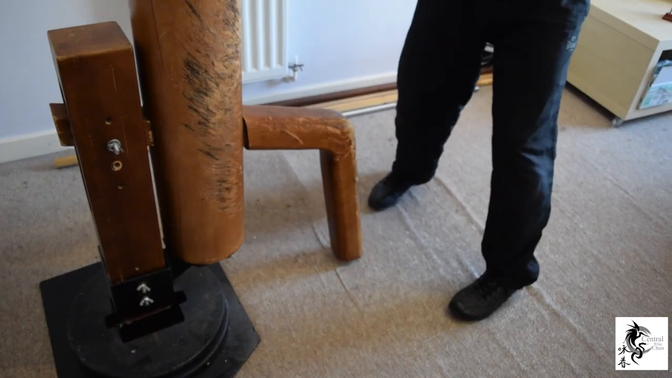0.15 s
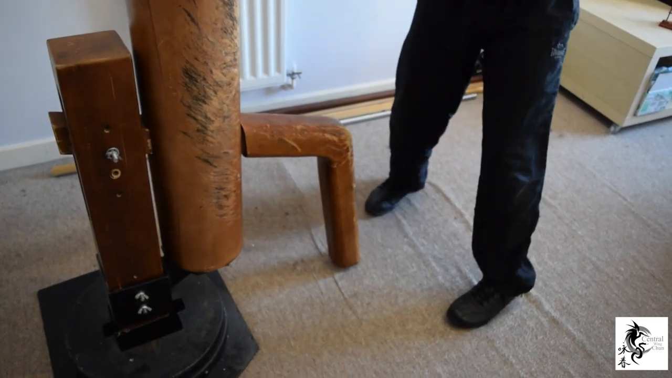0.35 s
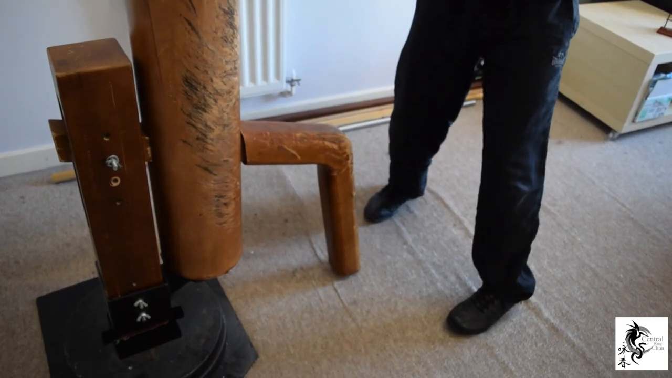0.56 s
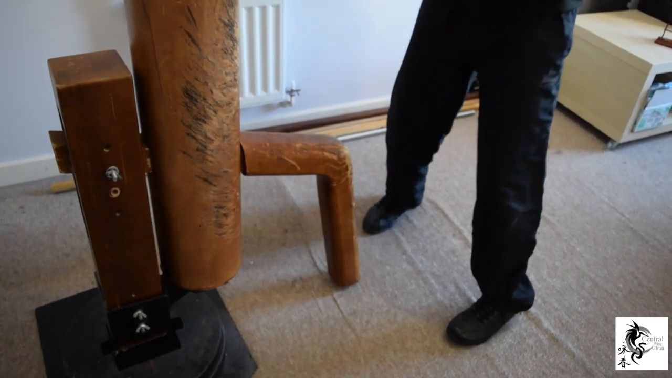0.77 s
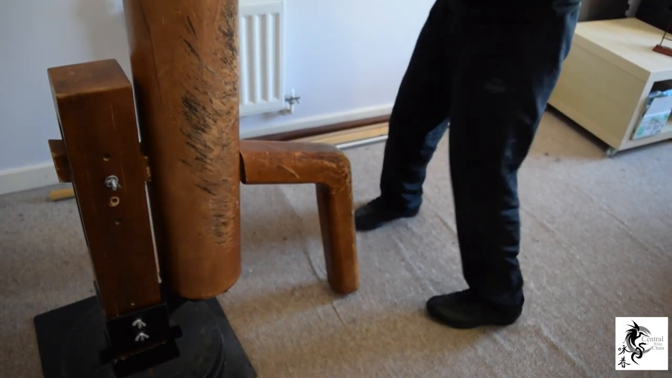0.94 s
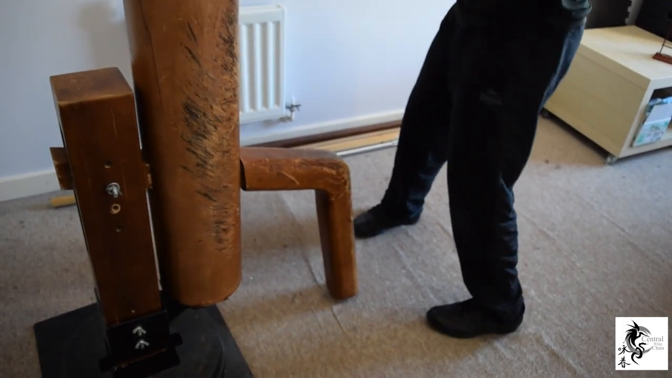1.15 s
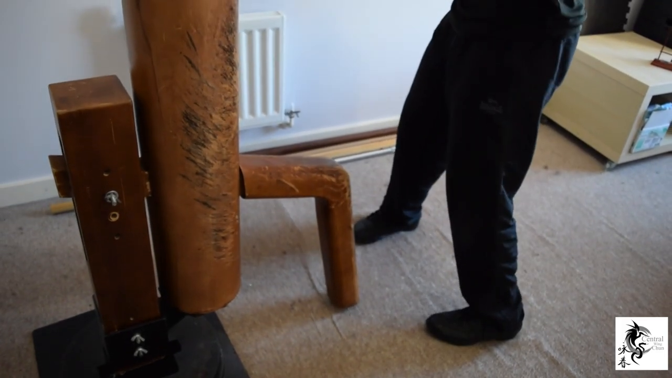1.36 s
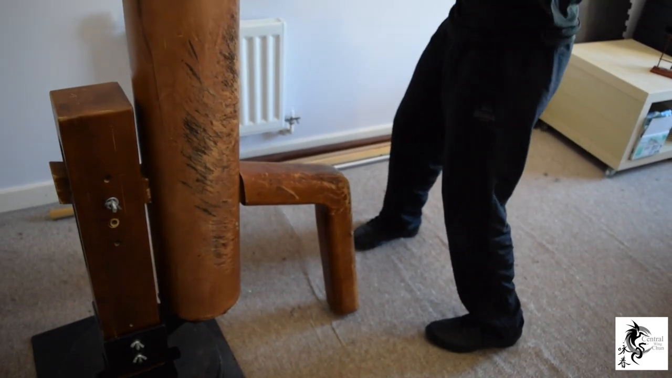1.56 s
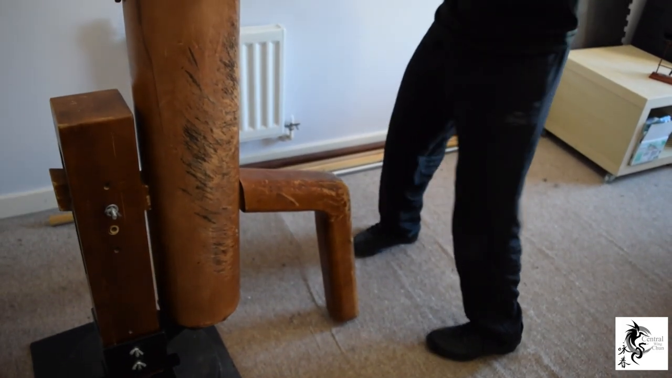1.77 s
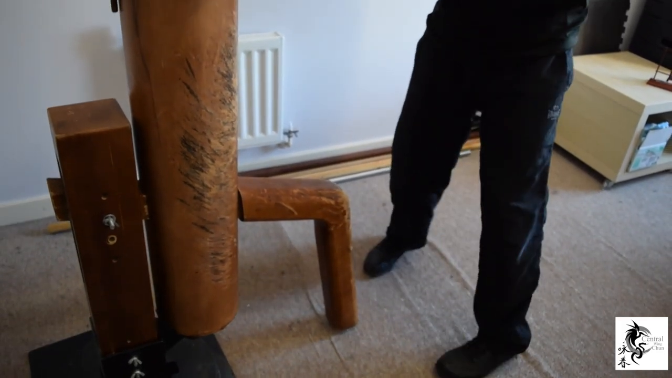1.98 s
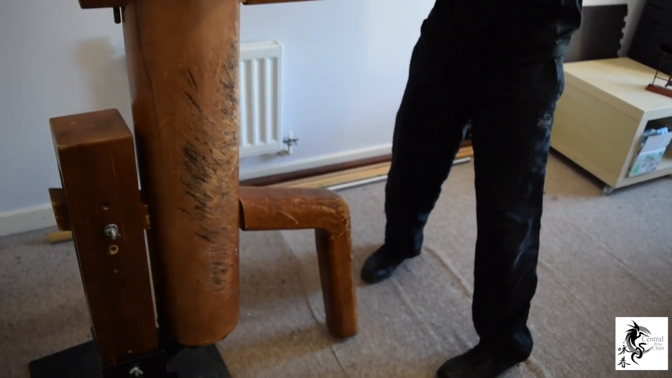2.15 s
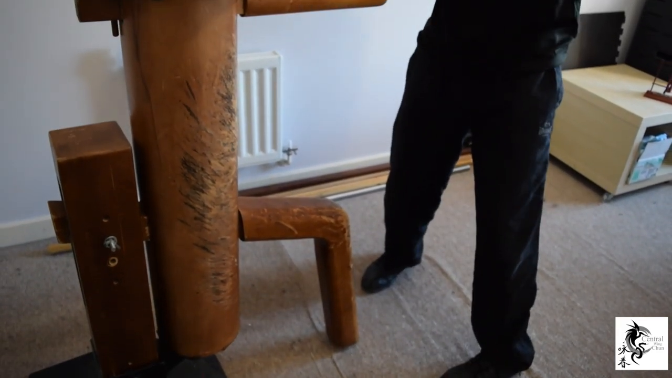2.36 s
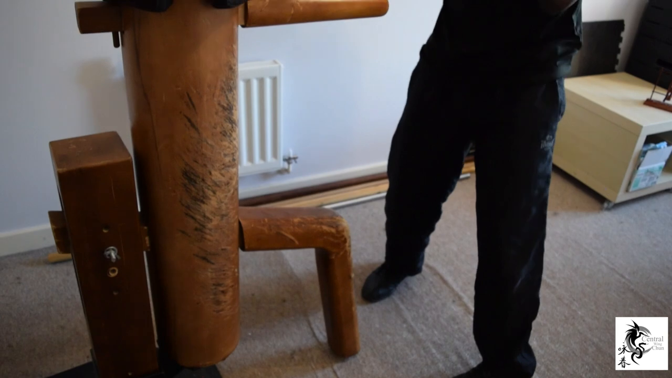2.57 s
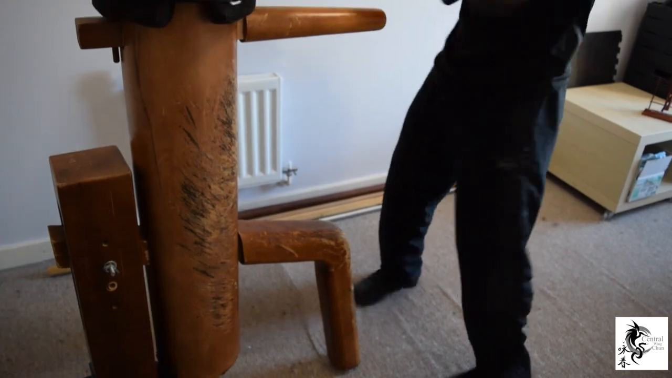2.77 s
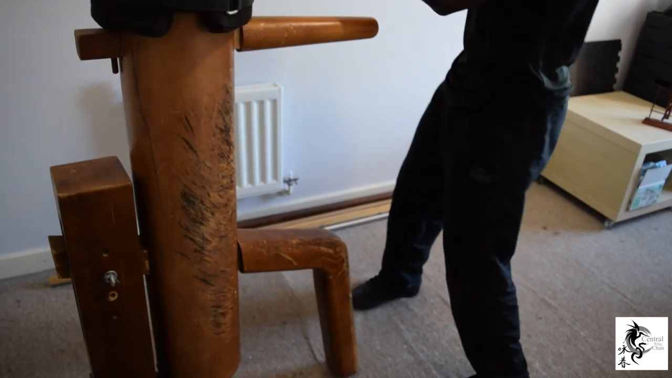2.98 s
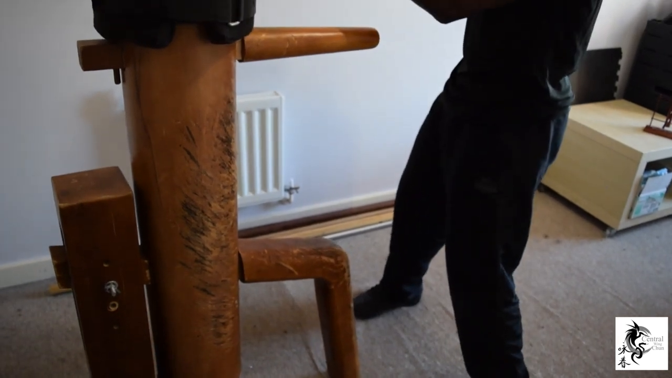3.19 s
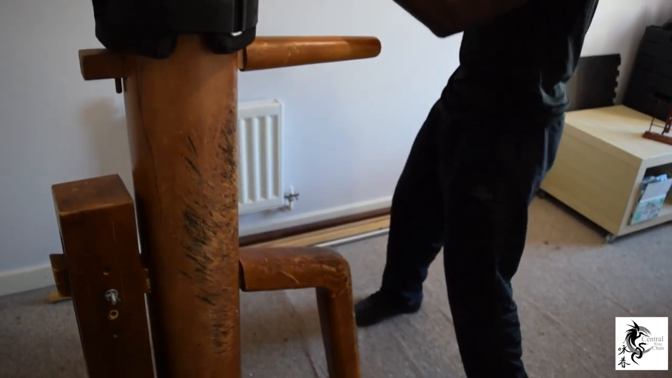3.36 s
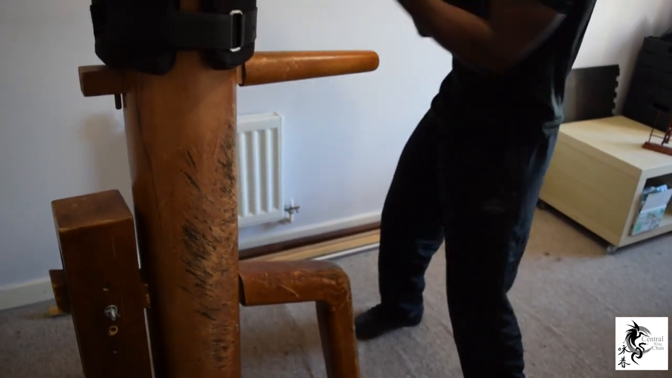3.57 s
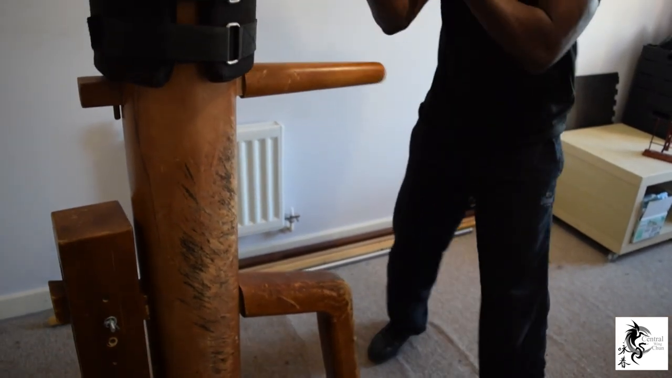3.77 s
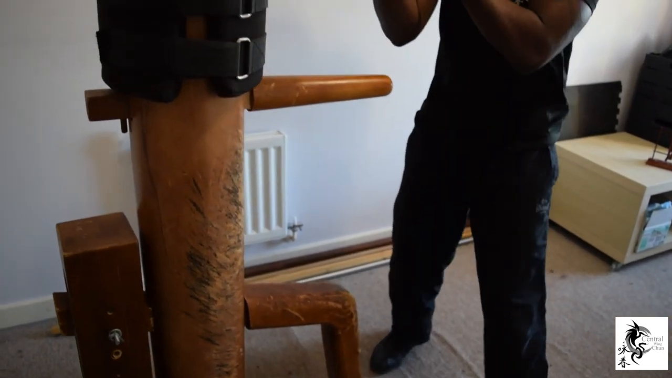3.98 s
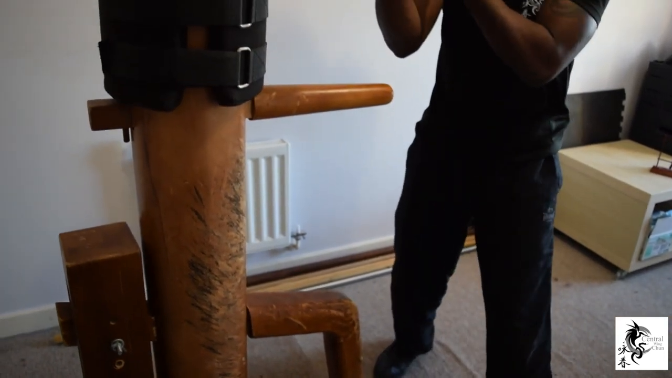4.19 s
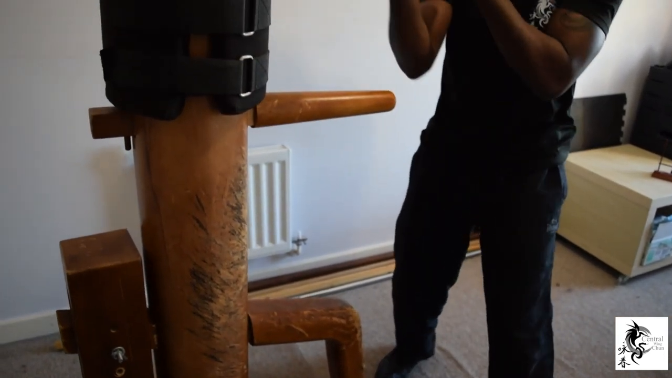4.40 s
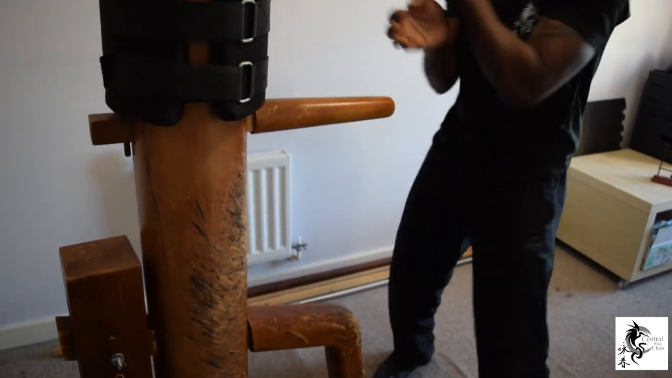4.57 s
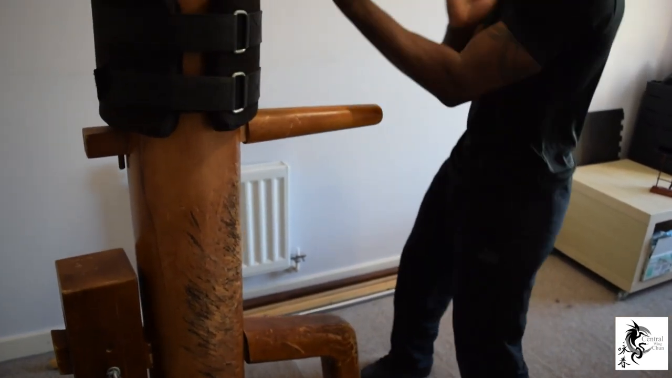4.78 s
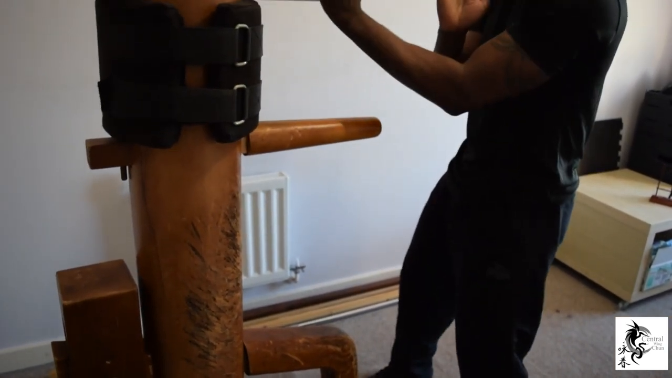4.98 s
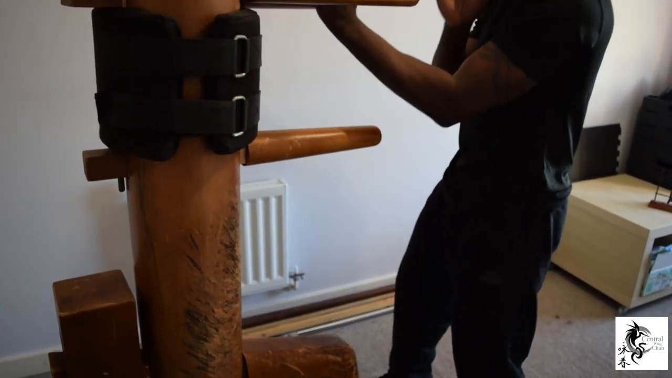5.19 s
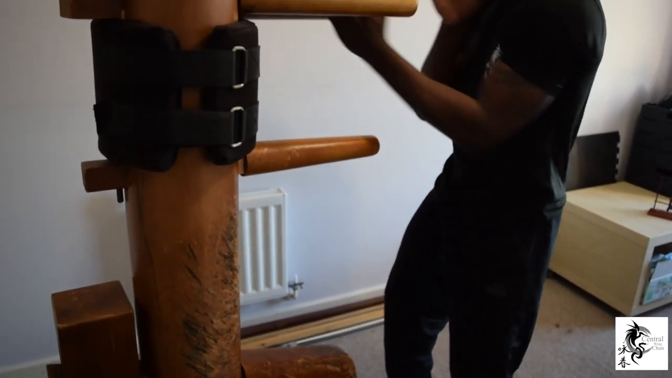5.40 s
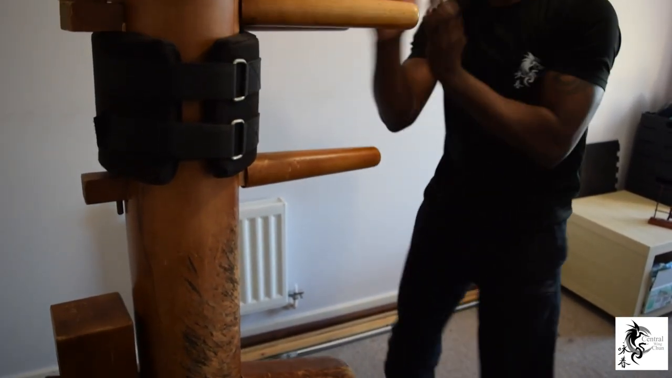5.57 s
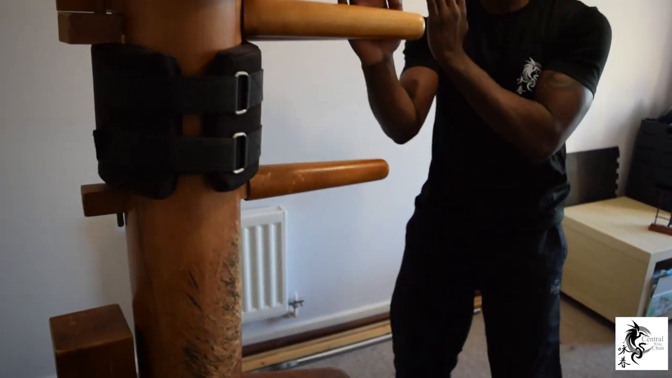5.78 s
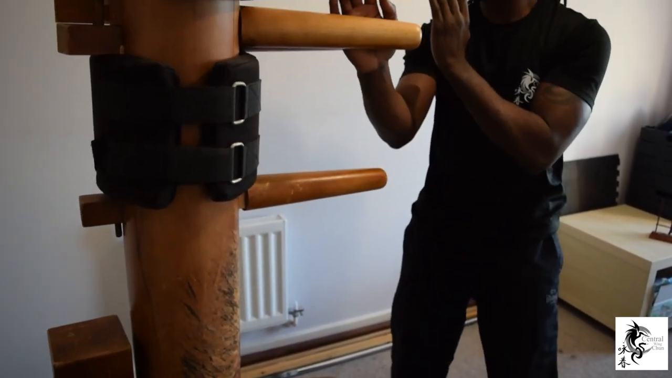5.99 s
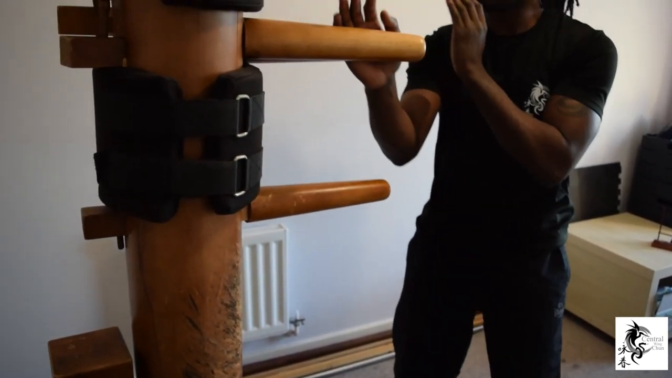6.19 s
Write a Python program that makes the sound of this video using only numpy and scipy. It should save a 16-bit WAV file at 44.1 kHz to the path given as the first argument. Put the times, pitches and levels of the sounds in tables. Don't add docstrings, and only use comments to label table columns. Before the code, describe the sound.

In a small carpeted room, bare hands and forearms hit the loose arms of a wooden dummy roughly once a second. Each blow is a dry, hollow clack with a skin slap and often a quick rattle in the socket. Light taps and cloth swishes fill the gaps. A close, nearly mono camera microphone overloads on hard hits, with soft hiss underneath.

```python
import sys
import numpy as np
from scipy import signal
from scipy.fft import rfft, irfft
from scipy.io import wavfile
from scipy.ndimage import uniform_filter1d

SR = 44100
rng = np.random.default_rng(int(sys.argv[2]) if len(sys.argv) > 2 else 0)


def amplitude_ratio(level_db):
    exponent = np.asarray(level_db, float) / 20
    return 10 ** exponent


def put_to_file(sound):
    columns = np.atleast_2d(sound).T
    safe = np.clip(columns, -1, 1)
    whole_steps = np.round(safe * 32767)
    wavfile.write(sys.argv[1], SR, whole_steps.astype(np.int16))


N = 275267

# (time [s], ring level [dB], share of the higher arm [0-1],
# slap level re ring [dB], hardness [dB per octave])
BLOWS = [(.062, -13.5, 0.06, -12.5, 0), (.140, -17.5, 0.4, -11, -4), (.455, -37.5, 1, -1.5, -1),
         (1.014, 9.5, 1, -15.5, -2.5), (1.109, -18, 0.4, -10.5, -5.5), (1.956, 4.5, 0.3, -16, -2.5),
         (2.889, -17, 0.35, -7.5, -5), (2.897, -12, 0.02, -6.5, -3.5), (2.923, -3.5, 0.36, -5.5, -5),
         (2.944, -10.5, 0.02, -6.5, -4.5), (3.808, -4.5, 0.35, -10, -2), (4.731, -6, 0.39, -17.5, -2),
         (4.742, -1.5, 0.83, -18, -3), (4.751, -7, 0.84, -8, -9), (4.800, -11.5, 0.24, -14, -2.5),
         (5.225, -40.5, 0.14, -8, -4.5), (5.250, -33, 0.08, -8.5, -1), (5.663, -8, 0.17, -21, -3.5)]
# (time [s], ring level [dB], tenon level re ring [dB], hardness [dB per octave])
RATTLES = [(.120, -23.5, -10.5, -5), (.198, -28, -24, -0.5), (.660, -70, -4.5, -2), (1.424, -52, -22, 2),
           (1.987, -7, -14.5, 5.5), (2.017, -5, -17, -1.5), (2.485, -52.5, -24, -2.5),
           (3.421, -53.5, -18, 8), (3.820, 4.5, -23.5, -5), (3.840, 4, -14, 3.5), (5.167, -48.5, -29, 2.5),
           (5.297, -57.5, -40, 7), (5.557, -52, -34, 1.5), (5.676, -8, -32, -4.5), (5.709, -4.5, -19, -2.5),
           (5.736, -24, -10.5, -3)]
# (time [s], ring level [dB], share of the higher arm [0-1], hardness [dB per octave])
TAPS = [(.042, -25, 0, 0), (.261, -42, 0.1, -11), (0.403, -45, 1, -8), (.447, -35.5, 0.66, -1),
        (0.766, -49, 0.37, -3), (1.202, -28.5, 0.3, -3), (1.557, -59, 0, -8.5), (2.370, -62.5, .1, -5.5),
        (2.407, -68.5, 0.1, -7.5), (3.018, -33.5, .4, 0), (3.073, -57, .3, -4), (3.230, -33, .6, -6),
        (4.169, -43.5, 0.23, -6.5), (5.115, -43, 0.57, -7.5), (5.655, -46, 0.46, 6),
        (5.998, -30.5, 0.3, -1.5)]
# (frequency [Hz], level [dB], decay t60 [s])
LOW_ARM_MODES = [(293, -24.5, 0.084), (475.6, -7.5, 0.012), (623.7, -9, 0.064), (635.4, -17.5, 0.097),
                 (771.8, 1.5, .05), (822, 5.5, 0.038), (1368, -2, 0.027), (1552, -4.5, 0.046),
                 (2379, -11, 0.034)]
HIGH_ARM_MODES = [(298, -35.5, .05), (922, -13, 0.091), (873, -4.5, 0.024), (1050.4, 2.5, 0.03),
                  (1144, -7.5, 0.084), (1261, -1, 0.028), (1372, -10, 0.034), (2220, -9, 0.021),
                  (2558, -16, 0.028)]
TENON_MODES = [(3837, 0, 0.023), (3930, -3, 0.012), (4330, -12.5, 0.008), (5900, -7, 0.0096),
               (9800, 1, 0.006), (11200, -24, .008), (643.8, 0, .06), (1506, -2, 0.044),
               (2368, -4.5, 0.039)]
# (frequency [Hz], level [dB])
SLAP_COLOUR = [(40, -43), (250, -12.5), (500, 2.5), (1000, 11), (2000, 7.5), (4000, -4), (8000, -13.5),
               (16000, -28.5)]
# (time [s], frequency [Hz], level [dB])
THUDS = [(.019, 46.3, -37.5), (0.451, 303, -47), (.455, 620, -37), (1.018, 140, -29.5), (1.02, 1184, -16),
         (1.208, 281, -39), (1.558, 643, -53.5), (1.56, 143, -59.5), (1.957, 206, -26), (2.898, 389, -23.5),
         (3.235, 336, -44.5), (3.841, 73.3, -27), (3.86, 612, -18.5), (3.895, 1580, -22.5),
         (3.898, 830, -20.5), (4.163, 480, -46), (4.733, 1040, -14.5), (5.119, 290, -55), (5.249, 302, -51),
         (5.252, 801, -41.5), (5.72, 1570, -26), (5.722, 129, -54), (6.002, 327, -44), (6.004, 620, -39)]
# (time [s], frequency [Hz], level [dB])
TICKS = [(0.049, 1535, -31.5), (.064, 5090, -34), (1.025, 2190, -29.5), (1.03, 11200, -46),
         (2.485, 1900, -69.5), (2.909, 11200, -44.5), (2.92, 1766, -9.5), (3.425, 1750, -47),
         (3.423, 5580, -59.5), (4.752, 3850, -35), (4.801, 4220, -30.5), (4.8, 4450, -35.5),
         (5.297, 5700, -60)]
# (time [s], frequency [Hz], level [dB], decay t60 [s])
HUMS = [
    (0.119, 141.4, -52.5, 0.28),
    (1.019, 1219, -50, 1.3),
    (1.96, 822.4, -43, 0.78),
    (1.96, 867, -54, 0.95),
    (1.962, 1204, -52, 1.2),
    (3.93, 137.6, -54, 0.27),
    (5.998, 68, -77, .47),
]
# (start [s], rise [s], end [s], level [dB])
SWISHES = [(-.1, .03, 0.038, -48), (0.849, 0.023, 0.89, -70.5), (0.899, 0.021, 1, -60.5),
           (1.195, 0.0086, 1.244, -54), (1.658, .05, 1.73, -79.5), (1.835, 0.028, 2.23, -61.5),
           (2.775, 0.027, 3.08, -62), (3.0, 0.032, 3.07, -50.5), (3.342, .02, 3.38, -69),
           (3.689, 0.084, 4.1, -59.5), (4.621, 0.037, 4.74, -61), (5.559, 0.047, 5.85, -61)]
# (frequency [Hz], level [dB per Hz])
CLOTH_COLOUR = [(59, -47.5), (100, -18.5), (243, -5.5), (744, 4), (1110, 6), (2090, 0), (2580, -1.5),
                (3470, -6), (10900, -15.5), (15600, -32)]
# (frequency [Hz], decay t60 [s])
ROOM_T60 = [(60, 0.26), (250, 0.43), (700, 0.36), (1400, 0.41), (2700, 0.3), (5400, 0.3), (8000, 0.22),
            (12000, 0.25), (15000, 0.047)]
# (frequency [Hz], level [dB])
ROOM_COLOUR = [(100, -9.5), (300, -2.5), (700, -1.5), (2500, -2), (6000, -2), (10000, -1.5), (14000, -11)]
# (frequency [Hz], side level re mid [dB])
ROOM_SIDE = [(60, -6), (250, -21), (700, -29), (1400, -24), (2800, -15), (5600, -14.5), (9000, -5),
             (14000, 5)]
# (frequency [Hz], level [dB per Hz])
HUSH_COLOUR = [(20, -28), (60, -12.5), (130, -21.5), (300, -20.5), (700, -15.5), (1300, -16.5), (1800, -19),
               (2400, -22), (5000, -28.5), (10800, -35.5), (15600, -46.5)]
# (frequency [Hz], side level re mid [dB])
HUSH_SIDE = [(60, -14.5), (110, -14), (200, -19), (380, -23), (700, -7.5), (1290, -13.5), (2380, -4.5),
             (4400, -2), (8120, -4), (15000, -4)]


def read(points, hz):
    f, value = np.transpose(points)
    return np.interp(np.log(hz + 1), np.log(f + 1), value)


def evened(x):
    return x / np.sqrt(np.mean(x ** 2) + 1e-20)


def colour(x, points, tilt_db=0):
    hz = np.fft.rfftfreq(x.shape[-1], 1 / SR)
    octaves = np.log2(np.maximum(hz, 300) / 1000)
    gain = amplitude_ratio(read(points, hz) + tilt_db * octaves)
    return irfft(rfft(x) * gain, x.shape[-1])


def add(mix, s, sound):
    part = mix[max(round(s * SR), 0):][:len(sound)]
    part += sound[:len(part)]


def contacts():
    rows = [(s, db, high, slap_db, hard_db, -41, 0) for s, db, high, slap_db, hard_db in BLOWS]
    rows += [(s, db, 0.22, -9.5, hard_db, tenon_db, 0) for s, db, tenon_db, hard_db in RATTLES]
    rows += [(s, db, high, 2.5, hard_db, -40, 0.0032) for s, db, high, hard_db in TAPS]
    return sorted(rows)


def ring(modes, t, chance, tilt_db=0, rise_s=0.0033):
    hz, db, t60 = np.transpose(modes)[:, :, None]
    level_chance, pitch_chance = chance[:2, :len(modes), None]
    db = db + 2 * level_chance + tilt_db * np.log2(hz / hz[0])
    struck_hz = hz * (1 + 0.016 * pitch_chance)
    tones = amplitude_ratio(db - 60 * t / t60) * np.sin(2 * np.pi * struck_hz * t)
    return tones.sum(0) * (1 - np.exp(-t / rise_s))


def knock(row, chance, noise):
    s, db, high, slap_db, hard_db, tenon_db, roll_s = row
    touch_s, touch_db = 0.003, -32
    t = np.arange(len(noise)) / SR
    high = np.clip(high, 0, 1)
    low_arm = np.sqrt(1 - high) * ring(LOW_ARM_MODES, t, chance[0])
    high_arm = np.sqrt(high) * ring(HIGH_ARM_MODES, t, chance[1])
    contact_s = 0.003 * amplitude_ratio(-0.18 * db)
    slap = evened(colour(noise, SLAP_COLOUR, hard_db))
    slap = slap * np.exp(-t / contact_s) * (1 - np.exp(-5 * t / contact_s))
    tenon = ring(TENON_MODES, t, chance[2], 0.97 * hard_db, rise_s=0.00078)
    blow = 0.41 * (low_arm + high_arm) + amplitude_ratio(slap_db) * slap + amplitude_ratio(tenon_db) * tenon
    blow = blow * (1 - np.exp(-t / (abs(roll_s) + 1 / SR)))
    lead = round(touch_s * SR)
    touch = amplitude_ratio(touch_db) * np.pad(slap, (0, lead))
    return s - lead / SR, amplitude_ratio(db) * (np.pad(blow, (lead, 0)) + touch)


def frame():
    out = np.zeros(N)
    t = np.arange(SR) / SR
    thuds = [(*row, 0.058) for row in THUDS]
    ticks = [(*row, 0.012) for row in TICKS]
    for s, hz, db, t60 in thuds + ticks + HUMS:
        attack = 1 - np.exp(-t * hz / 0.92)
        add(out, s, amplitude_ratio(db - 60 * t / t60) * np.sin(2 * np.pi * hz * t) * attack)
    return out


def sleeve():
    t = np.arange(N) / SR
    stroke = np.zeros(N)
    for start, rise, end, db in SWISHES:
        swell = np.clip((t - start) / rise, 0, 1) ** 2
        stroke += amplitude_ratio(db) * swell * np.clip((end - t) / 0.012, 0, 1)
    grain = amplitude_ratio(0.75 * evened(uniform_filter1d(rng.standard_normal(N), 150)))
    return evened(colour(rng.standard_normal(N), CLOTH_COLOUR) * grain) * stroke


def room(x):
    build_s = 0.01
    taps = np.zeros((2, SR))
    at = np.arange(90, SR - 20, 20) + rng.integers(0, 20, (2, (SR - 91) // 20))
    np.put_along_axis(taps, at, rng.choice([-1., 1.], at.shape), 1)
    taps *= 1 - np.exp(-np.arange(SR) / SR / build_s)
    hz, t, bands = signal.stft(taps, SR, nperseg=256)
    decay = amplitude_ratio(-60 * t / read(ROOM_T60, hz)[:, None])
    tail = signal.istft(bands * decay, SR, nperseg=256)[1]
    tail = colour(tail, ROOM_COLOUR)
    tail[1] = colour(tail[1], ROOM_SIDE)
    mid, side = signal.fftconvolve(x[None], tail / np.linalg.norm(tail[0]), axes=1)[:, :N]
    return np.array([mid + side, mid - side])


def hush():
    mid, side = colour(rng.standard_normal((2, N)), HUSH_COLOUR)
    side = colour(side, HUSH_SIDE)
    return amplitude_ratio(-70) * np.array([mid + side, mid - side]) / mid.std()


def scene():
    spots, rows = np.zeros((3, N)), contacts()
    chance = rng.standard_normal((len(rows), 3, 2, 9))
    noise = rng.standard_normal((len(rows), 8192))
    for k, row in enumerate(rows):
        add(spots[k % 3], *knock(row, chance[k], noise[k]))
    spots[0] += sleeve()
    spots[1] += amplitude_ratio(2.0) * frame()
    direct = amplitude_ratio(3.0) * spots.sum(0)
    echoes = amplitude_ratio(0.5) * sum(room(x) for x in spots)
    return direct + echoes + hush()


def band_limit(x):
    return signal.sosfilt(signal.butter(12, 15710, fs=SR, output="sos"), x)


def record(dry):
    threshold_db, slope, lag_s, recovery_db_per_s = -17.5, 0.49, 0.013, 60
    ceiling, edge_hz = 0.232, 15550
    level_db = 20 * np.log10(abs(dry).max(0) + 1e-9)
    fall_db = np.arange(N) * recovery_db_per_s / SR
    peak_db = np.maximum.accumulate(level_db + fall_db) - fall_db
    over_db = np.maximum(peak_db - threshold_db, 0)
    lag = np.exp(-1 / (lag_s * SR))
    held = dry / amplitude_ratio(slope * signal.lfilter([1 - lag], [1, -lag], over_db))
    clipped = held / (1 + abs(held / ceiling) ** 8) ** (1 / 8)
    lowpass = signal.firwin(511, edge_hz, window=("kaiser", 9), fs=SR)
    mix = signal.oaconvolve(clipped, lowpass[None], "same") - 0.0006
    return band_limit(mix)


dry = scene()
out = record(dry)
put_to_file(out)
```